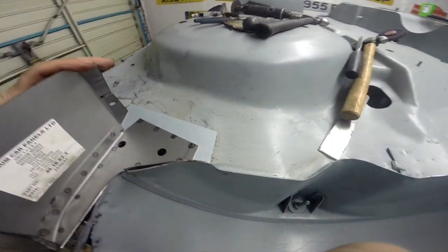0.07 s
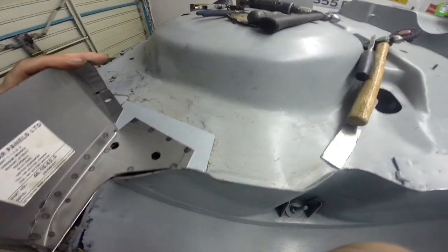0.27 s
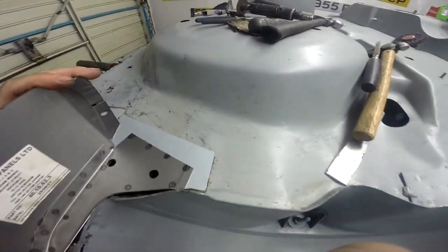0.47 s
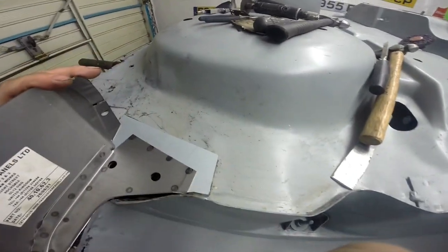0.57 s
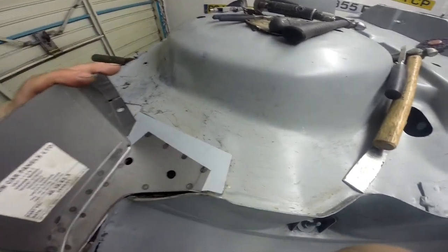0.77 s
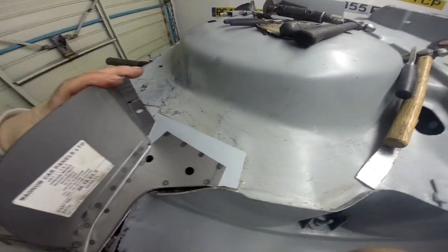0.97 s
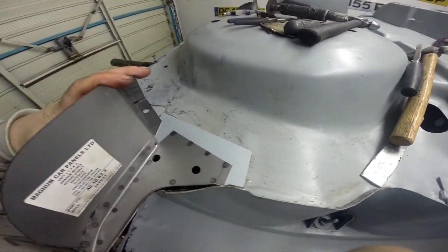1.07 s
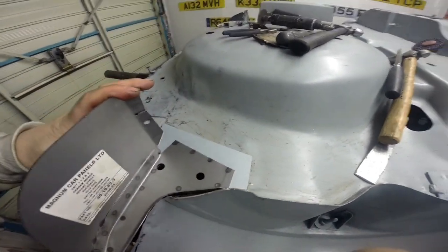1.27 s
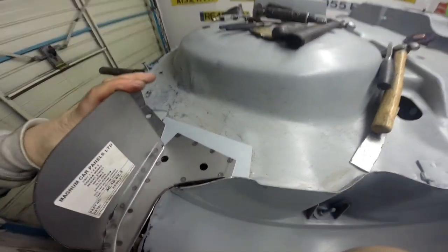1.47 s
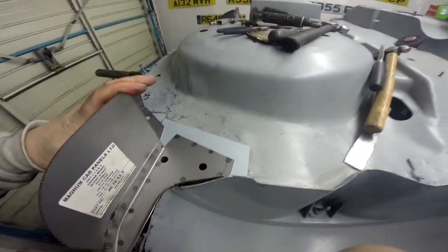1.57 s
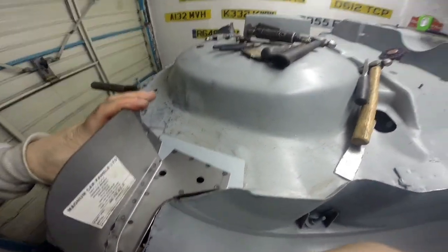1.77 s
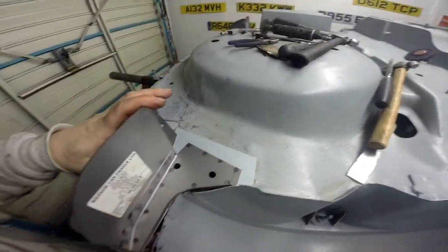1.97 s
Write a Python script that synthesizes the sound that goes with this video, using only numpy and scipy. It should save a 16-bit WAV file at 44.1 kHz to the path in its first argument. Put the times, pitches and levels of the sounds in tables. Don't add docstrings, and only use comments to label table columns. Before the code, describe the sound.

A steel panel hits a hollow car body with one loud sharp clang, then a lighter knock, followed by short scrapes and squeaks, a dull thud and a late bump, close to the microphone in a small garage.

```python
import sys
import numpy as np
from scipy import signal
from scipy.fft import rfft, irfft
from scipy.io import wavfile
from scipy.ndimage import uniform_filter1d

SR = 44100
rng = np.random.default_rng(int(sys.argv[2]) if len(sys.argv) > 2 else 0)


def gain_from_decibels(decibels):
    exponent = np.asarray(decibels, float) / 20
    return 10 ** exponent


def inscribe(sig):
    pcm = np.round(np.clip(np.atleast_2d(sig).T, -1, 1) * 32767)
    wavfile.write(sys.argv[1], SR, pcm.astype(np.int16))


N = 88200
LONGEST_RING_S = 0.33


def evened(x):
    return x / np.sqrt(np.mean(x ** 2) + 1e-20)


def read(points, hz):
    f, value = np.transpose(points)
    return np.interp(np.log(hz + 1), np.log(f + 1), value)


def add(mix, s, sound):
    part = mix[max(round(s * SR), 0):][:len(sound)]
    part += sound[:len(part)]


def colour(x, points):
    hz = np.fft.rfftfreq(len(x), 1 / SR)
    return irfft(rfft(x) * gain_from_decibels(read(points, hz)), len(x))


def resonate(x, hz, width_hz):
    r = np.exp(-np.pi * width_hz / SR)
    return signal.lfilter([1 - r, 0, r - 1], [1, -2 * r * np.cos(2 * np.pi * hz / SR), r * r], x)


def modes(hz, db, t60, size):
    t = np.arange(size) / SR
    phase = rng.random((len(hz), 1))
    decay = gain_from_decibels(db[:, None] - 60 * t / t60[:, None])
    return decay * np.sin(2 * np.pi * (hz[:, None] * t + phase))


def pushed(ring, push_s):
    t = np.arange(len(ring)) / SR
    ring = ring * (1 - np.exp(-(t / max(push_s, 1e-4)) ** 2))
    return ring / np.sqrt(np.mean(ring[:SR // 20] ** 2))


def rattled(ring, rattle_s, rattle_db):
    t = np.arange(4096) / SR
    chatter = rng.standard_normal(len(t)) * np.exp(-t / rattle_s)
    force = gain_from_decibels(rattle_db) * chatter * (rng.random(len(t)) < 0.01)
    force[0] = 1
    return signal.fftconvolve(ring, force)


# frequency in Hz, level in dB.
HUM = [(20, 3.5), (200, -5), (450, -14), (1000, -19.5), (3000, -27.5), (8500, -35.5), (10000, -38),
       (14500, -41)]


def hum():
    t = np.arange(N) / SR
    air = evened(colour(rng.standard_normal(N), HUM))
    whine = np.sin(2 * np.pi * 8800 * t) + 0.5 * np.sin(2 * np.pi * 11720 * t)
    return gain_from_decibels(-52) * air + gain_from_decibels(-80) * whine


def pressure(s, length, start_db, end_db, release_s):
    u = np.arange(N) / SR - s
    onset = np.clip(u / 0.008, 0, 1)
    release = np.clip((length - u) / release_s + 0.5, 0, 1) ** 2
    return onset * release * gain_from_decibels(start_db + (end_db - start_db) * np.clip(u / length, 0, 1))


def stick_slip():
    slips_per_s, spread_db, judder_db = 8000, 1.5, 1
    clicks = (rng.random(N) < slips_per_s / SR) * rng.standard_normal(N)
    clicks = clicks * gain_from_decibels(spread_db * rng.exponential(1, N).clip(0, 4))
    judder = uniform_filter1d(uniform_filter1d(rng.standard_normal(N), 300), 300)
    return evened(clicks) * gain_from_decibels(judder_db * evened(judder))


def bank(x, table):
    out = np.zeros(N)
    for k, (hz, width_hz, db) in enumerate(table):
        out += (-1) ** k * gain_from_decibels(db) * resonate(x, hz, width_hz)
    return out


# start in seconds, length in seconds, drone level in dB, grit level in dB.
STROKES = [(-.01, 0.091, -51.5, -64), (.212, 0.032, -45, -60), (0.451, 0.047, -46.5, -48.5),
           (0.531, 0.058, -53.5, -57.5), (1.005, 0.12, -53.5, -58.5), (1.094, 0.064, -50, -55),
           (1.16, 0.066, -47, -57), (1.232, 0.13, -50.5, -63.5), (1.282, 0.038, -48.5, -58),
           (1.379, 0.099, -48, -61.5), (1.464, 0.042, -40.5, -51.5), (1.498, 0.08, -47.5, -50),
           (1.61, 0.066, -34.5, -44), (1.787, 0.013, -57, -51), (1.83, 0.081, -50.5, -57.5),
           (1.881, 0.042, -46.5, -48)]
# start in seconds, length in seconds, drone level in dB, grit level in dB.
CATCHES = [
    (1.145, 0.031, -46, -57),
    (1.316, 0.05, -46.5, -52.5),
    (1.362, 0.023, -45.5, -53),
    (1.569, 0.0467, -39, -46),
    (1.898, 0.0456, -59, -52.5),
    (1.673, 0.03, -41.5, -57.5),
    (1.977, 0.059, -65, -57),
]
# frequency in Hz, bandwidth in Hz, level in dB.
DRONE = [(347, 91, -8.5), (640, 62, -3.5), (765, 88, -4.5), (887.6, 93, -1), (960, 126, -4),
         (1172, 160, -10.5)]
# frequency in Hz, bandwidth in Hz, level in dB.
STEEL = [(1950, 340, 6), (2530, 33, 4.5), (3280, 1400, -8), (4450, 930, 14), (6110, 110, 5)]
# frequency in Hz, level in dB.
GRIT = [(700, -12), (1300, 4), (3540, 6.5), (6000, -1.5), (8800, -15), (10800, -12), (11300, -39)]


def scrape():
    slips, low, high = stick_slip(), np.zeros(N), np.zeros(N)
    drags = [(row, (0, -5, 0.022)) for row in STROKES] + [(row, (-8, 0, 0.005)) for row in CATCHES]
    for (s, length, drone_db, grit_db), shape in drags:
        force = slips * pressure(s, length, *shape)
        low += gain_from_decibels(drone_db) * force
        high += gain_from_decibels(grit_db) * force
    drone = bank(low, DRONE) / np.std(bank(slips, DRONE))
    steel = bank(high, STEEL) / np.std(bank(slips, STEEL))
    wide = colour(high, GRIT) / np.std(colour(slips, GRIT))
    return drone + 1.28 * steel + gain_from_decibels(2.5) * wide


# start in seconds, level in dB, contact time in seconds, share of free ring from 0 to 1.
THUDS = [
    (.001, -52.5, 0.0066, 0.32),
    (1.614, -31.5, 0.012, 0.8),
    (1.655, -57, 0.0071, 0.4),
    (1.7, -46.5, 0.023, 1),
    (1.883, -39.5, 0.0018, 0.4),
]
# frequency in Hz, level in dB, T60 in seconds.
PANEL = [(220, -12, 0.087), (343, 1.5, 0.16), (523.7, -8.5, 0.38), (610, 1.5, 0.11), (633, -8.5, 0.9),
         (648, -9.5, 0.6), (832, -7.5, 0.37), (783, -0.5, 0.19), (960, -14, .15), (1077, -13, 0.45),
         (1174, -10, 0.089), (1241, -10.5, 0.13)]


def thuds():
    out = np.zeros(N)
    hz, db, t60 = np.transpose(PANEL)
    for s, panel_db, contact_s, share in THUDS:
        mode_db = db - 14 * (1 - share) * np.log2(900 / hz)
        mode_t60 = np.minimum(t60, LONGEST_RING_S) * np.clip(share, 0.1, 1)
        body = modes(hz, mode_db, mode_t60, 16000).sum(0)
        add(out, s, gain_from_decibels(panel_db) * pushed(rattled(body, contact_s, -1.1), 0.00026))
    return out


# start in seconds, frequency in Hz, level in dB, T60 in seconds, held time in seconds.
TONES = [(.234, 172, -24.5, 0.42, 0), (.24, 445, -27.5, 0.098, 0.024), (.236, 5600, -32, 0.18, 0.022),
         (.236, 4000, -31, 0.24, 0), (0.21, 530, -30.5, 0.14, 0.039), (.378, 231, -38.5, 0.14, .13),
         (0.34, 190, -47.5, 0.65, 0.12), (.7, 227, -44.5, 0.4, .03), (.69, 177, -54, .6, 0.042),
         (0.704, 76, -48.5, 0.43, .12), (.69, 2100, -53, 0.18, 0), (.684, 2400, -44.5, 0.13, 0),
         (.7, 2439, -52.5, 0.22, 0.014), (1.618, 237, -27.5, 0.078, 0.053),
         (1.612, 540, -35.5, 0.084, 0.025), (1.612, 690, -42, 0.13, 0.088), (1.7, 237, -39, .06, 0.018),
         (1.742, 232, -35, 0.1, .04), (1.6, 77, -43, 0.19, 0.053), (1.883, 180, -32.5, 0.072, 0),
         (1.884, 618, -38, 0.075, 0.022)]


def tones():
    out, t = np.zeros(N), np.arange(16000) / SR
    rise_s, wobble_db = 0.0045, 3
    noises = rng.standard_normal((len(TONES), len(t)))
    for (s, hz, db, t60, held_s), noise in zip(TONES, noises):
        wobble = evened(uniform_filter1d(uniform_filter1d(noise, size=500), size=500))
        depth_db = wobble_db * np.log2(hz / 120).clip(0, 2) / 2
        level_db = db + depth_db * wobble - 60 * np.maximum(t - held_s, 0) / t60
        sine = np.sin(2 * np.pi * hz * t + 3 * noise[0])
        add(out, s, gain_from_decibels(level_db) * (1 - np.exp(-t / rise_s)) * sine)
    return out


# start in seconds, crack level in dB, sheet level in dB, tilt in dB per octave.
KNOCKS = [
    (.2295, -14.5, -21, -0.88),
    (.551, -48.5, -56, 0.5),
    (.684, -32.5, -45, 1),
    (1.101, -48, -60.5, -2),
]
# frequency in Hz, level in dB, T60 in seconds.
RING = [(366, -21, 0.14), (427, -3, 0.23), (504, -2.5, 0.16), (567.5, -7, 0.24), (629.4, -8.5, 0.66),
        (793, -11, 0.26), (939, -5, 0.21), (1058, -6, 0.2), (1275, -8, 0.4), (1452, -18, 0.48),
        (1984, -4.5, 0.18), (4370, -16, 0.26)]
# frequency in Hz, level in dB.
SHEET = [(200, -17), (500, -13.5), (1000, -8), (3300, -19), (4350, -14.5), (5500, -17.5), (8800, -27.5),
         (11500, -36.5)]
# frequency in Hz, T60 in seconds.
SHEET_T60 = [(250, 0.5), (1000, 0.19), (3000, 0.17), (6000, 0.11), (12000, 0.054)]
# frequency in Hz, level in dB.
CRACK = [(180, -29), (300, -16.5), (2680, -2), (3250, -10.5), (4280, -2), (12500, -21.5), (14400, -28)]


def knocks():
    out, size, t = np.zeros(N), 24000, np.arange(2048) / SR
    hz = np.sort(200 + 11500 * rng.random(440) ** 2.4)
    dense_db = read(SHEET, hz) + 4.4 * np.log(hz / 3000) + 0.75 * rng.standard_normal(len(hz))
    dense = modes(hz, dense_db, read(SHEET_T60, hz), size)
    ring_hz, ring_db, ring_t60 = np.transpose(RING)
    ring = modes(ring_hz, ring_db, np.minimum(ring_t60, LONGEST_RING_S), size)
    all_hz = np.r_[hz, ring_hz]
    spot = rng.standard_normal((len(KNOCKS), len(all_hz)))
    spot[0] = 0
    for (s, crack_db, sheet_db, tilt_db), spot_db in zip(KNOCKS, 2 * spot):
        drive = gain_from_decibels(tilt_db * np.log2(all_hz / 1500) + spot_db)
        sheet = evened(drive[:len(hz)] @ dense) + gain_from_decibels(-5) * evened(drive[len(hz):] @ ring)
        add(out, s, gain_from_decibels(sheet_db) * pushed(rattled(sheet, 0.042, -4), 0.0068))
        crack = evened(colour(rng.standard_normal(len(t)), CRACK))
        add(out, s, gain_from_decibels(crack_db) * crack * np.minimum(t / 0.0021, 1) * np.exp(-t / 0.0083))
    return out


# start in seconds, level in dB, decay in seconds, tilt in dB per octave.
TICKS = [(0.2296, -14.5, .002, 7), (0.4497, -45, 0.0064, -8), (1.1014, -37, 0.0038, -0.5),
         (1.278, -46.5, .006, -12), (1.2882, -52, .004, -8), (1.3241, -44, 0.0059, -4),
         (1.3969, -45, 0.0025, -4), (1.4695, -48, .006, -12), (1.5137, -49, .003, -7),
         (1.615, -38, 0.0034, 1), (1.884, -48, .003, -4)]


def ticks():
    out, t = np.zeros(N), np.arange(1024) / SR
    noises = rng.standard_normal((len(TICKS), len(t)))
    for (s, db, decay_s, tilt_db), noise in zip(TICKS, noises):
        tilt = [(300, -3 * tilt_db), (14000, 2.5 * tilt_db)]
        snap = evened(colour(colour(noise, CRACK), tilt))
        add(out, s, gain_from_decibels(db) * snap * np.minimum(t / 0.00031, 1) * np.exp(-t / decay_s))
    return out


# start in seconds, frequency in Hz, level in dB, T60 in seconds.
NOTES = [(.2297, 2670, -18, 0.033), (.2297, 4344, -15.5, 0.081), (.232, 7510, -20, 0.036),
         (.236, 1905, -21, 0.11), (.55, 894, -27, 0.027), (.684, 1090, -28, 0.036),
         (.683, 2200, -33, 0.029), (.684, 4370, -32.5, 0.026), (.7, 1983, -40, 0.13),
         (1.597, 960, -24, 0.016), (1.884, 903, -26.5, 0.12), (1.884, 632, -34, 0.037)]


def notes():
    out, size = np.zeros(N), 8192
    rise = np.minimum(np.arange(size) / SR / 0.0025, 1)
    for s, hz, db, t60 in NOTES:
        near_hz = hz * np.array([0.965, 1, 1.03])
        near_db = db + np.array([-6.0, 0, -6])
        add(out, s, modes(near_hz, near_db, t60 * np.ones(3), size).sum(0) * rise)
    return out


# frequency in Hz, level in dB, T60 in seconds.
BOOM = [
    [(74.2, -2, 1), (80.1, 0.5, 0.56), (97, 4.5, 0.27)],
    [(128, -15, 0.71), (139.4, -12, 0.94), (156.8, -10.5, 0.45), (176.3, -2.5, 0.3), (183.4, -14, 0.52)],
    [(225.8, 9.5, 0.48), (240.3, -3.5, 3.3), (264.6, -2.5, 1.4), (281, 5, 0.47), (290, -5, 0.16)],
]
# start in seconds, deep level in dB,
# middle level in dB, upper level in dB, free time in seconds.
BOOMS = [
    (0.233, -38.5, -39.5, -38, 0.16),
    (0.376, -56.5, -48, -48.5, 0.17),
    (.686, -46.5, -53.5, -48, 0.18),
    (1.614, -45.5, -51, -53, 0.14),
]


def booms():
    out, size = np.zeros(N), 16000
    push_s, catch_s = 0.0069, 0.022
    t = np.arange(size) / SR
    deep, middle, upper = [evened(modes(*np.transpose(group), size).sum(0)) for group in BOOM]
    for s, deep_db, middle_db, upper_db, free_s in BOOMS:
        body = gain_from_decibels(deep_db) * deep + gain_from_decibels(middle_db) * middle + gain_from_decibels(upper_db) * upper
        body = 0.73 * rattled(body, 0.032, -13.5)[:size]
        swell = 1 - np.exp(-(t / push_s) ** 2)
        damping = np.exp(-(np.maximum(t - free_s, 0) / catch_s) ** 2)
        add(out, s, body * swell * damping)
    return out


# start in seconds, length in seconds, frequency in Hz, level in dB.
SQUEALS = [(1.106, 0.02, 3580, -48.5), (1.108, 0.037, 1890, -61), (1.173, 0.036, 3620, -50.5),
           (1.301, 0.064, 870, -45), (1.51, 0.039, 2650, -51.5), (1.591, 0.0168, 5810, -38.5),
           (1.66, 0.065, 3440, -56), (1.822, 0.089, 3280, -53.5), (1.887, 0.059, 3510, -45),
           (1.89, 0.052, 4270, -46.5), (1.883, 0.0555, 928, -40), (1.962, 0.063, 3540, -55),
           (1.966, 0.027, 980, -55.5), (.703, 0.025, 4450, -52), (1.022, .065, 1950, -58.5),
           (1.095, 0.094, 5000, -57), (1.144, .025, 5780, -61), (1.333, 0.038, 4880, -56),
           (1.338, 0.034, 1940, -53.5), (1.353, 0.019, 3520, -57), (1.404, 0.098, 2470, -59),
           (1.474, 0.028, 3280, -51), (1.51, 0.024, 3150, -53.5), (1.614, 0.062, 3430, -57),
           (1.165, 0.022, 704, -51)]


def squeals():
    out = np.zeros(N)
    for s, length, hz, db in SQUEALS:
        width_hz = min(hz / 14.2, 230)
        song = resonate(resonate(rng.standard_normal(N), hz, width_hz), hz, 2 * width_hz)
        out += gain_from_decibels(db) * pressure(s, length, -1.6, 0, 0.005) * evened(song)
    return out


# frequency in Hz, T60 in seconds.
GARAGE = [(100, 1), (500, 0.62), (2000, 0.5), (8000, 0.39)]


def garage(x):
    taps = rng.standard_normal(SR) * (np.arange(SR) > 300)
    hz, t, z = signal.stft(taps, SR, nperseg=256)
    decay = gain_from_decibels(-60 * t / read(GARAGE, hz)[:, None])
    tail = signal.istft(z * decay, SR, nperseg=256)[1]
    return signal.fftconvolve(x, tail / np.linalg.norm(tail))[:N]


def scene():
    hits = knocks() + notes() + booms() + thuds() + tones() + ticks()
    rub = scrape() + squeals()
    mono = hits + rub + garage(gain_from_decibels(-15) * hits + gain_from_decibels(-12.5) * rub) + hum()
    return np.array([mono, mono])


def top_cut(x):
    return signal.sosfilt(signal.butter(12, 14600, fs=SR, output="sos"), x)


# start in seconds, length in seconds.
SPLITS = [
    (0.205, 0.026),
    (0.446, 0.023),
    (0.674, 0.034),
    (1.08, 0.064),
    (1.273, 0.029),
    (1.487, 0.032),
    (1.596, 0.024),
    (1.854, 0.03),
]


def record(dry):
    mask_hz, mask_db, side_db = 8900, -44, -24
    hz, _, z = signal.stft(dry[0], SR, nperseg=2048)
    power = abs(z) ** 2
    masker = power[hz > mask_hz / 10].sum(0)
    audible = uniform_filter1d(power, size=5, axis=0) > gain_from_decibels(2 * mask_db) * masker
    keep = audible | (hz[:, None] < mask_hz)
    mono = signal.istft(z * keep, SR, nperseg=2048)[1][:N]
    t = np.arange(N) / SR
    split = sum((t > s) & (t < s + length) for s, length in SPLITS)
    trace = np.roll(mono, 40) * gain_from_decibels(side_db) * split
    return top_cut(np.array([mono + trace, mono - trace]))


dry = scene()
out = record(dry)
inscribe(out)
```